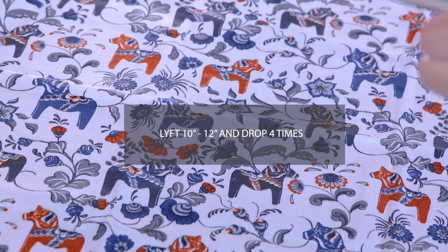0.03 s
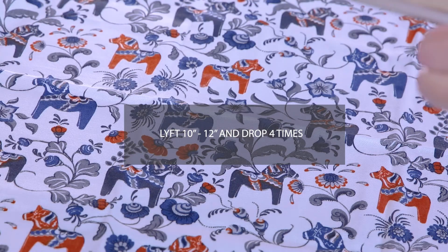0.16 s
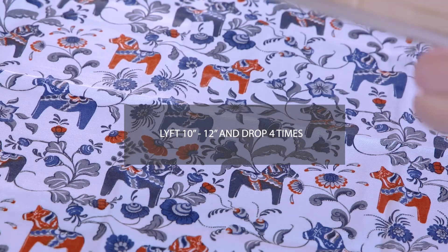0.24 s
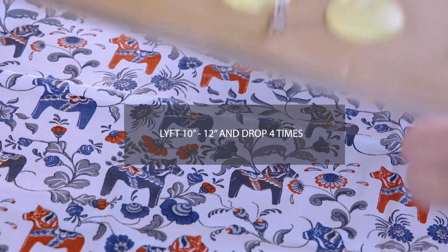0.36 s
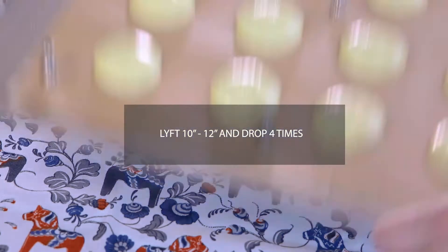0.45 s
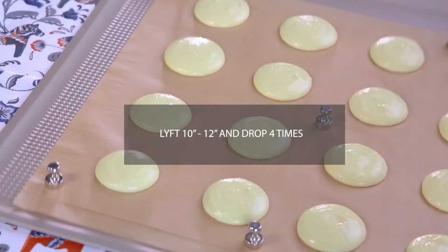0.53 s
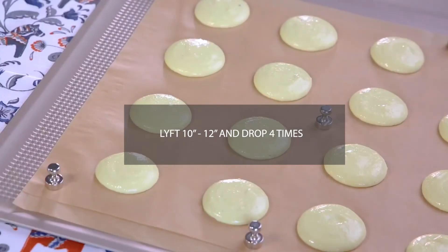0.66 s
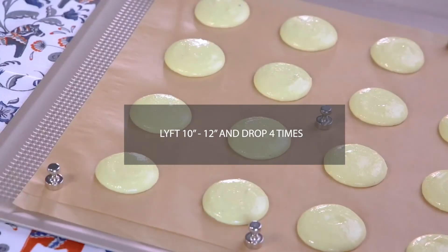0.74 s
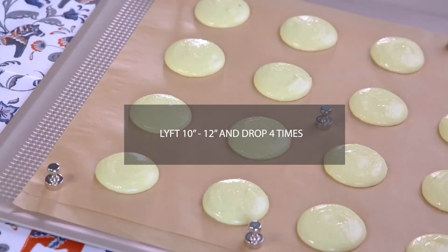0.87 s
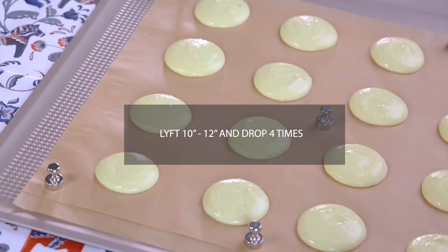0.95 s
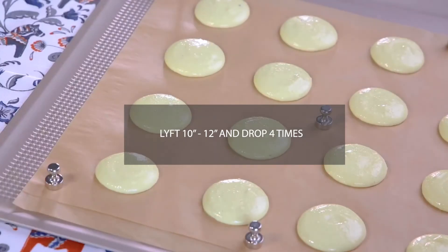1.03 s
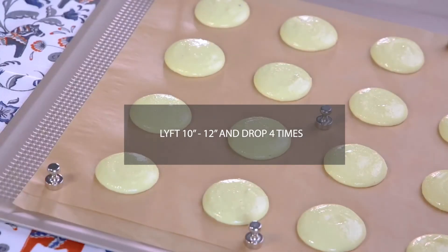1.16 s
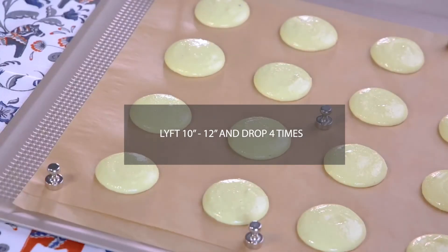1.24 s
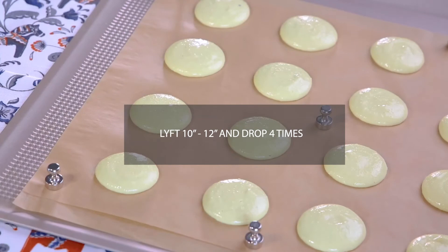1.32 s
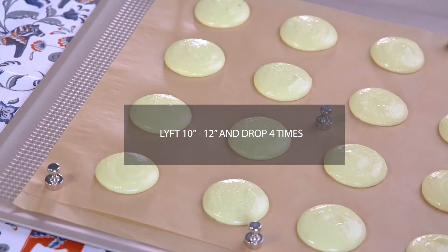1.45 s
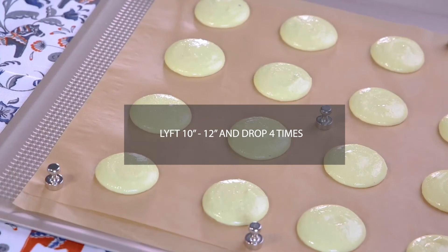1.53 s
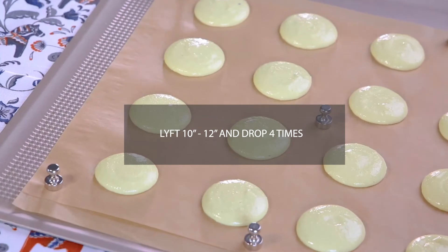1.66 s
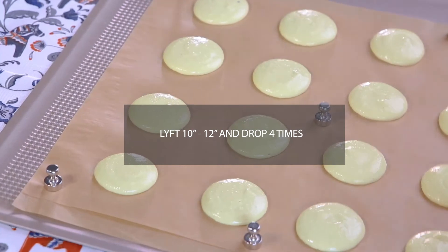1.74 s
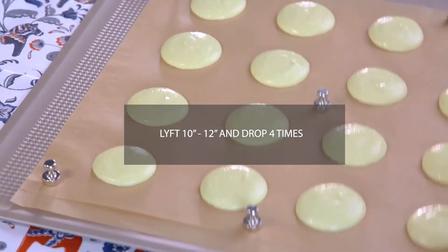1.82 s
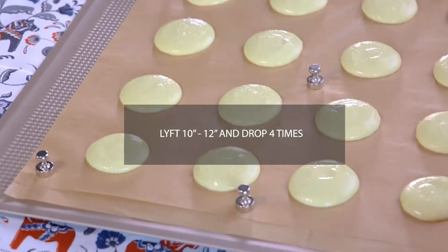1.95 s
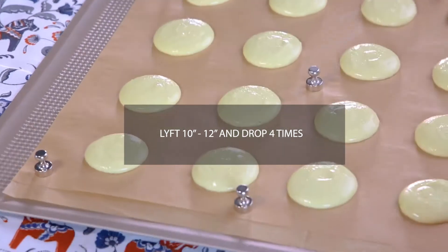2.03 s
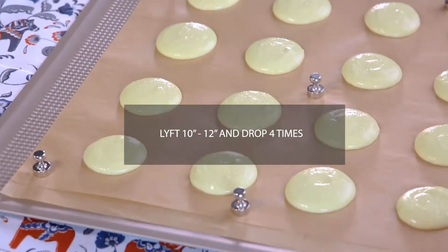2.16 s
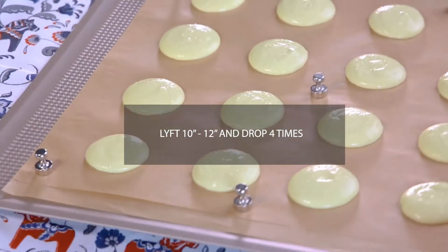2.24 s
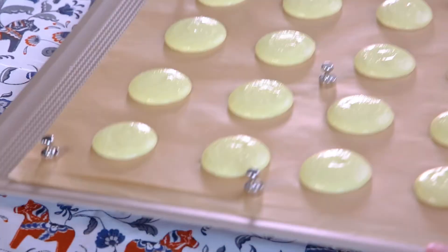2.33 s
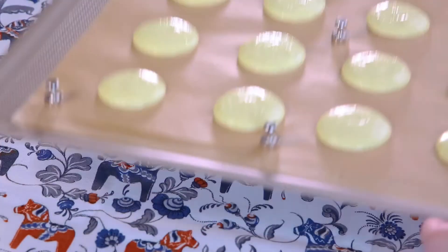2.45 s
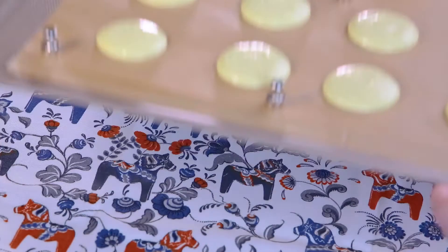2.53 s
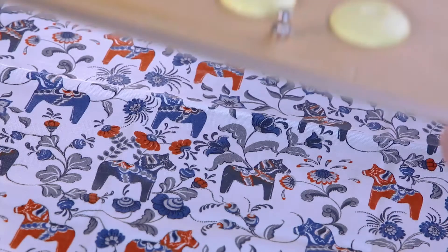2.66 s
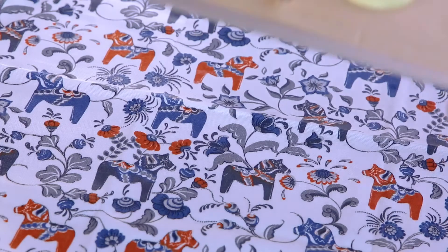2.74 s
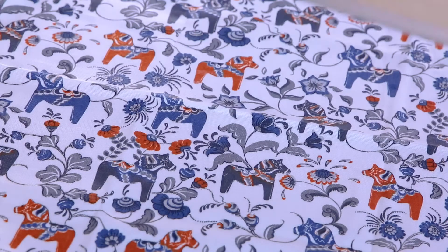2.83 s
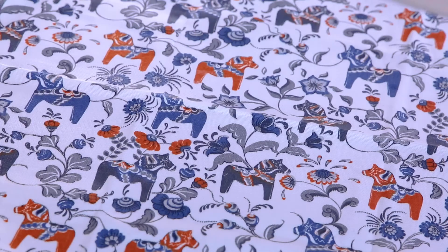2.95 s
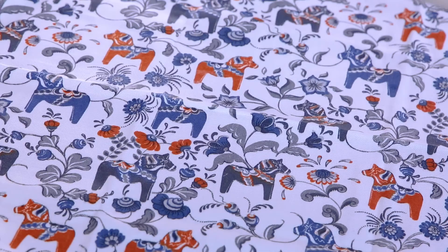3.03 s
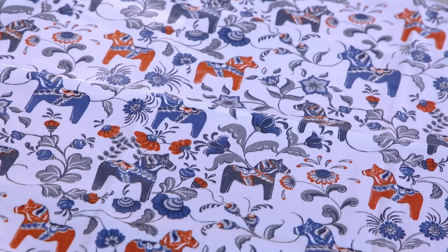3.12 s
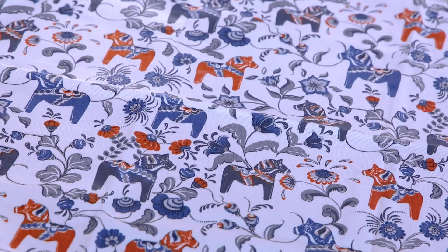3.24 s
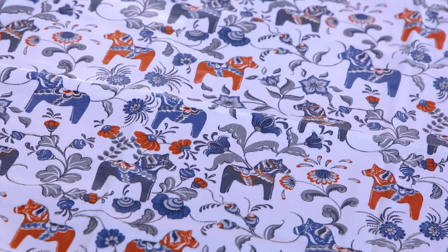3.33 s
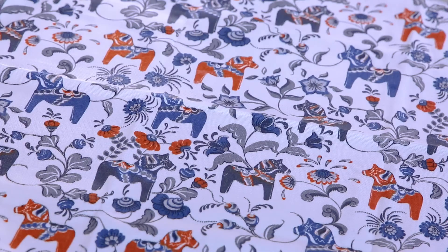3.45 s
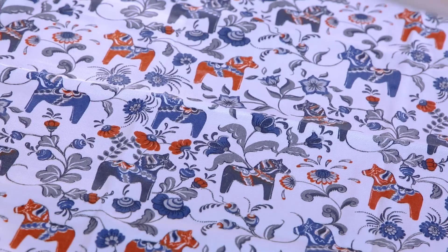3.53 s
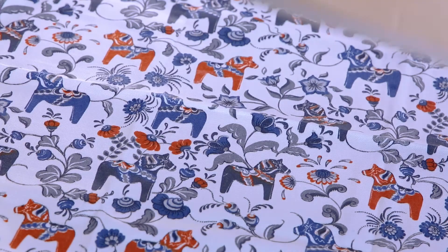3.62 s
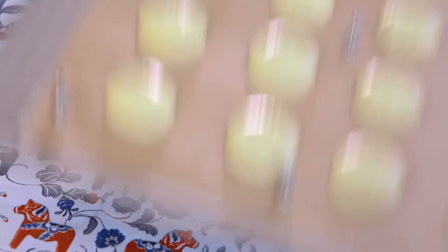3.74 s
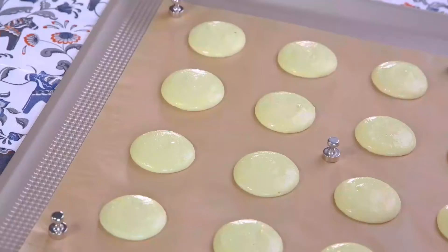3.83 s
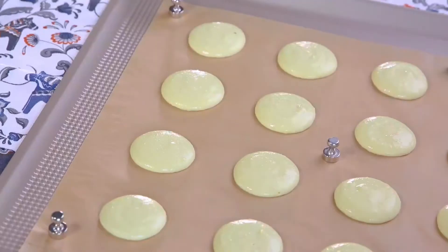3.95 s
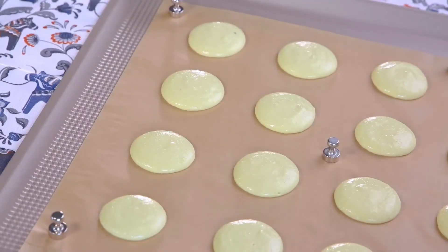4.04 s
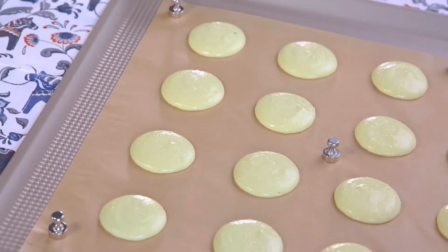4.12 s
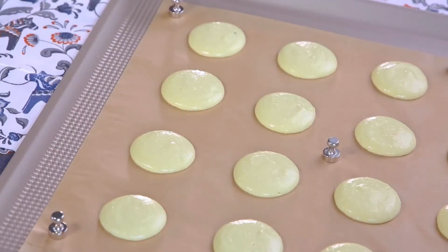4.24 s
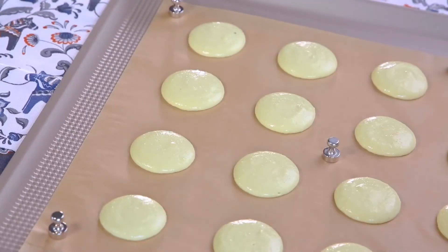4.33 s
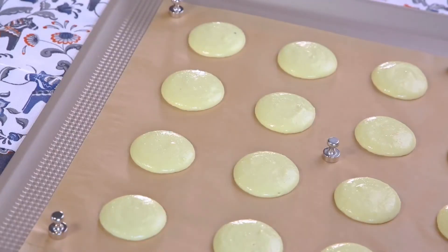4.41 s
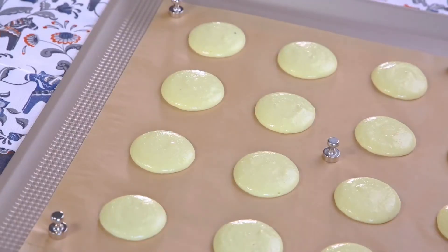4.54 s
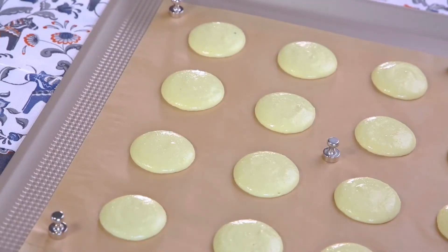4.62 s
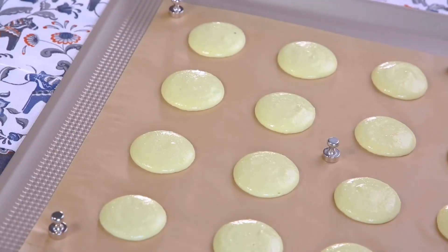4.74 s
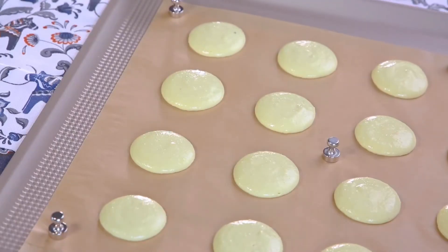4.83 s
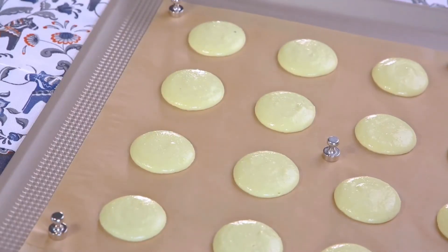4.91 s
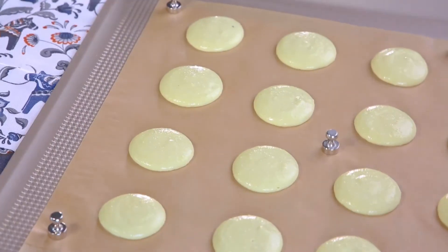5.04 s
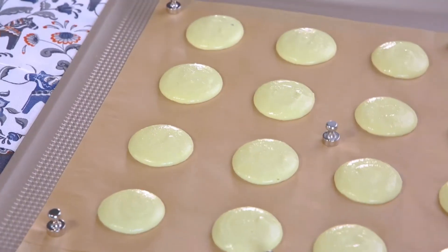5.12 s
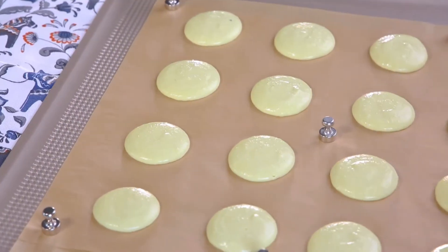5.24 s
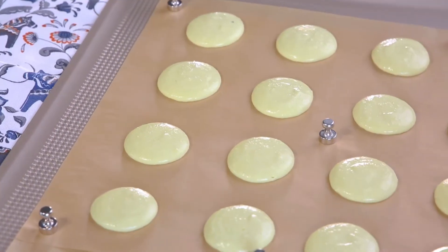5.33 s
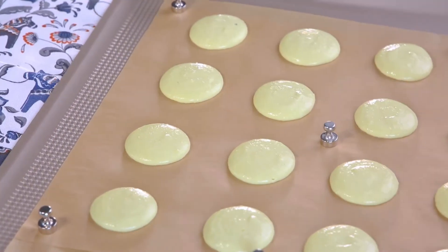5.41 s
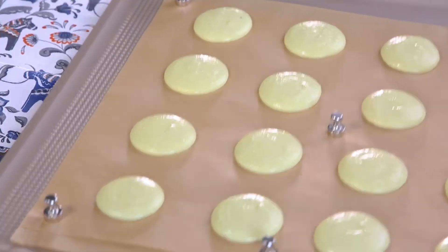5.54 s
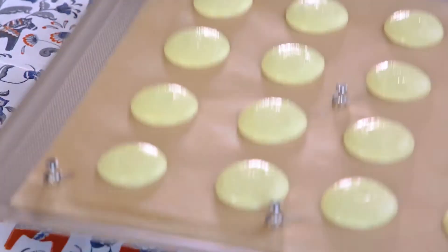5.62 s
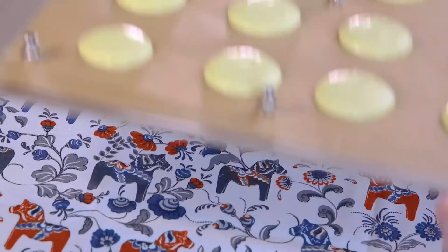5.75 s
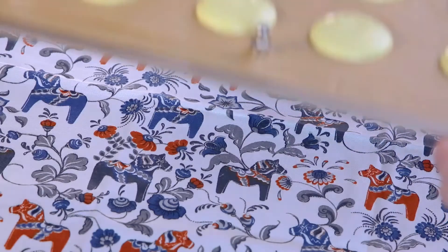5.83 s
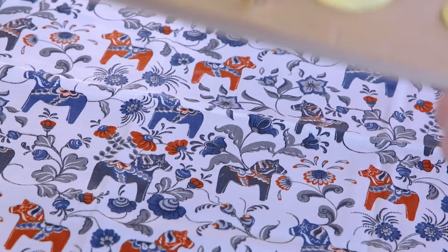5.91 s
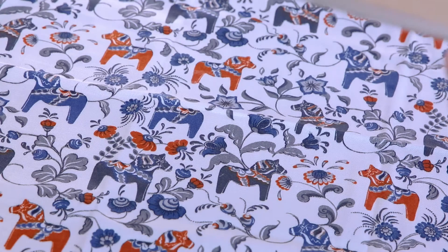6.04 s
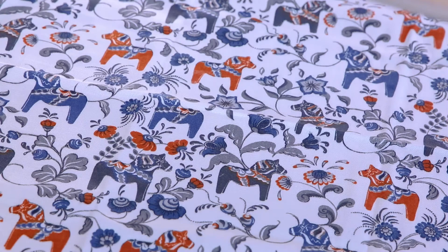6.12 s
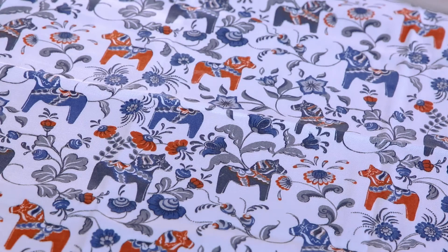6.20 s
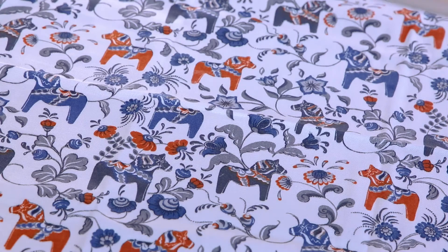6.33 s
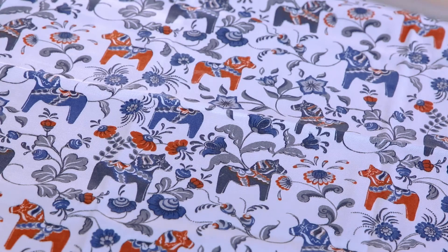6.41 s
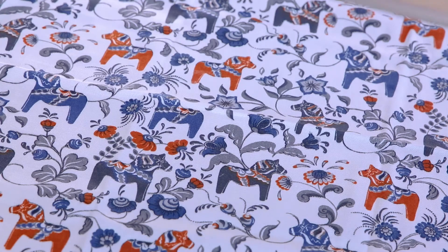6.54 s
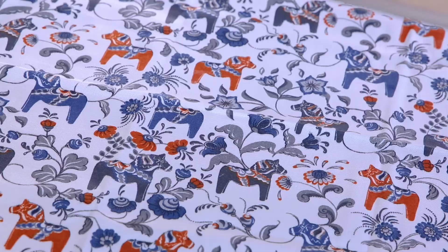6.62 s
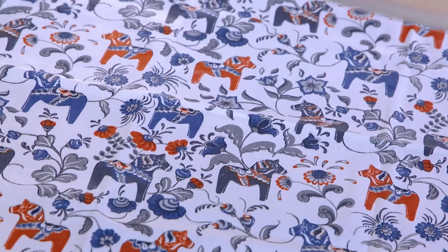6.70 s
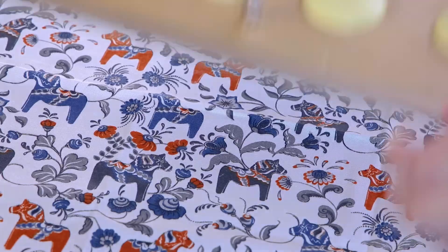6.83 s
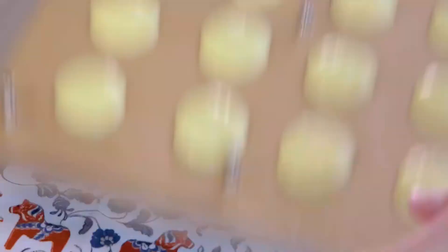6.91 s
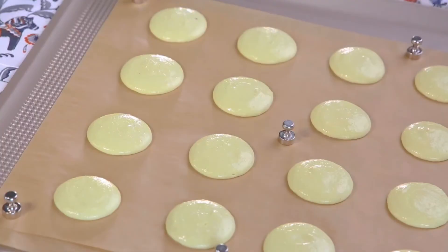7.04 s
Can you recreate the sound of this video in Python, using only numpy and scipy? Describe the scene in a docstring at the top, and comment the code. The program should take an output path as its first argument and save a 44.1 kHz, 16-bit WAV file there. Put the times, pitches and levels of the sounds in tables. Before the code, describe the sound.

Three times, a steel baking tray crashes flat onto a cloth-covered kitchen table with a hard double slap and ringing room echo, faint hum and cricket between.

```python
"""A flat crash, slap and fading echo, three times: a steel baking tray lands on a cloth-covered table in
a hard-walled kitchen. Around the drops: rim slides, tray ticks, paper rasps, hum, whines, a cricket.
Tray blows are decaying modes plus a noise crack; echo, slides, rasps, air and rumble are shaped noise;
the cricket is a modulated tone with a noise blur. The recorder's gain falls at loud sounds and climbs
back steadily, which holds the echo up; what it misses clips."""
import sys
import numpy as np
from scipy import signal
from scipy.fft import rfft, irfft
from scipy.io import wavfile
from scipy.ndimage import uniform_filter1d

SR = 44100
rng = np.random.default_rng(int(sys.argv[2]) if len(sys.argv) > 2 else 0)


def waveform_to_disk(signal):
    """Save audio, clipped to [-1, 1], as 16-bit WAV at the path in sys.argv[1]."""
    frames = np.transpose(np.atleast_2d(signal))
    scaled = np.clip(frames, -1, 1) * 32767
    samples = np.round(scaled).astype(np.int16)
    wavfile.write(sys.argv[1], SR, samples)


N = 311787

# ticks of the flexing tray, each with a paper rasp: t/s, blow level/dB, region f/Hz, rasp level/dB
TRAY_TICKS = [(0.1163, -50, 3371, -70.5), (1.7348, -46.5, 1597, -56.5), (1.9688, -44, 2606, -56),
              (2.7090, -54, 4230, -54.5), (2.7140, -33, 2650, -50.5), (2.7290, -49.5, 6263, -63.5),
              (3.1400, -54.5, 2700, -71), (3.2736, -39.5, 2661, -57), (3.6420, -53, 4300, -57)]
# drops: corner touches, rim rolls down in four blows, table thuds, middle slaps and rebounds:
# first rim blow t/s, rim blow level/dB, first rim region f/Hz, last rim region f/Hz,
# crack re blow/dB, corner lead/s, rim blow gap/s, slap delay/s, slap level/dB, thud level/dB,
# thud region f/Hz, rumble level/dB, rumble f/Hz, air cushion level/dB, cushion rise time/s
DROPS = [(.5652, 15.274, 1455, 1047, -6.5, .0011, .0019, .0117, 17.13, -5, 230.2, -22, 80.34, -45, .015),
         (3.8308, 15, 2200, 1250, -7.5, .002, .0018, .008, 17.41, 1.5, 160.3, -24, 48.09, -36.5, .008),
         (7.0374, 9.868, 2640, 1304, -9.5, 0.0012573, .0025, .0122, 15.944, -1.5, 144.2, -27.5, 69.7, -44, 0.01041)]


def amp(db):
    """Decibels to gain."""
    return 10 ** (np.asarray(db) / 20)


def evened(x):
    """Scales to an rms of one."""
    return x / np.sqrt(np.mean(x ** 2) + 1e-20)


def read(points, hz):
    """Value of a spectrum table, interpolated over log frequency."""
    f, value = np.transpose(points)
    return np.interp(np.log(hz + 1), np.log(f + 1), value)


def add(mix, start_s, sound):
    """Mixes a sound in from start_s."""
    part = mix[round(start_s * SR):][:len(sound)]
    part += sound[:len(part)]


def noise(count, gain_db):
    """Noise of rms one; gain_db gives its colour as a function of Hz."""
    hz = np.fft.rfftfreq(count, 1 / SR)
    spectrum = rfft(rng.standard_normal(count)) * amp(gain_db(hz))
    return evened(irfft(spectrum, count))


def wander(count, smooth_samples):
    """Slow random drift of rms one: smoothed noise."""
    return evened(uniform_filter1d(rng.standard_normal(count), smooth_samples))


def hill_db(hz, centre_hz, octaves):
    """Bell-shaped weighting over pitch, floored at -60 dB."""
    return np.maximum(-6 * (np.log2((hz + 1) / centre_hz) / octaves) ** 2, -60)


def peak_db(hz, centre_hz, width_hz):
    """Colour of a steep narrow resonance."""
    return -20 * np.log10(1 + (2 * (hz - centre_hz) / width_hz) ** 2)


def room_tone():
    """Fridge fan and room air as noise with faint drifting patches, over a wavering hum."""
    # air spectrum: f/Hz, relative level per Hz/dB
    air_spectrum = [(12, -55.5), (20, -27), (49, -13), (85, -17), (123, -7), (208, -4), (455, -6.5),
                    (672, -9.5), (794, -8.5), (1240, -15.5), (2290, -20), (3890, -25.5), (4870, -25),
                    (5750, -28), (15700, -35)]
    air_db, hum_hz, hum_db = -57, 121.64, -69.5
    frames, hz = N // 256 + 5, np.fft.rfftfreq(2048, 1 / SR)
    real, imag, patches = rng.standard_normal((frames, 1025, 3)).T
    # smooth over frequency, then time
    patches = evened(uniform_filter1d(uniform_filter1d(patches, 20, 0), 12, 1))
    frames_z = (real + 1j * imag) * amp(read(air_spectrum, hz)[:, None] + .9 * patches)
    air = evened(signal.istft(frames_z, nperseg=2048, noverlap=1792)[1][:N])
    waver = amp(1.5 * wander(N, 6000))
    hum = np.sqrt(2) * np.sin(2 * np.pi * hum_hz * np.arange(N) / SR) * waver
    return amp(air_db) * air + amp(hum_db) * hum


def whines():
    """Faint whines of the fridge motor: noise in narrow resonances."""
    # f/Hz, width/Hz, level/dB
    resonances = [(353.75, 37, -70), (574, 29, -70), (1406.9, 20, -77), (2283.5, 450, -73)]
    return sum(amp(db) * noise(N, lambda f: peak_db(f, hz, width_hz)) for hz, width_hz, db in resonances)


def chirps():
    """Cricket envelope: soft-edged chirps, each slightly early or late, louder or softer."""
    # evenly spaced chirps: middle of first chirp t/s, end t/s, period/s, level/dB
    bouts = [(0.122, .5, 0.3428, -69.5), (1.322, 2.8, 0.26863, -70.5), (3.069, 7, .269, -70.5)]
    chirp_s, jitter_s, spread_db = .18, .012, 1.3205
    t, envelope = np.arange(N) / SR, np.zeros(N)
    for first_s, end_s, period_s, db in bouts:
        for middle_s in np.arange(first_s, end_s, period_s):
            late, loud = rng.standard_normal(2)
            offset_s = t - middle_s - jitter_s * late
            envelope += amp(db + spread_db * loud) * np.exp(-np.abs(1.9 * offset_s / chirp_s) ** 3)
    return envelope


def cricket():
    """Wing strokes modulate a drifting pure tone; scattering on the way adds a blur around it."""
    wing_hz, blur_width_hz, strokes_per_s = 4937.7, 170, 64
    envelope = chirps()
    turns = np.cumsum(strokes_per_s * (1 + .1 * wander(N, 4000))) / SR
    strokes = 1 + .65 * np.cos(2 * np.pi * turns)
    drift = 1 + .005 * wander(N, 1500)
    tone = np.sqrt(2) * np.sin(2 * np.pi * np.cumsum(wing_hz * drift) / SR)
    blur = noise(N, lambda f: peak_db(f, wing_hz, blur_width_hz))
    return envelope * (.45 * strokes * tone + .9 * blur)


def blow(db, region_hz, crack_db, octaves, far_db):
    """One contact rings the modes near its region and cracks; returns near sound and wall feed."""
    # tray modes, damped by cloth and paper: f/Hz, relative level/dB, t60/s
    modes = [(131.8, -17.5, 0.038), (235.58, -10, 0.03), (431.25, -12, 0.065), (528.36, -6, .03),
             (643.61, -1.5, 0.032), (764.23, -5, .02), (910, -0.5, 0.01), (1173.8, -5, 0.013),
             (1358.7, -0.5, 0.01), (1630.9, -4, 0.016), (1763.6, -3.5, 0.015), (2011.2, -2.5, 0.0095),
             (2181.6, -1.5, 0.011), (2570.5, 0, 0.014), (2958.9, -7.5, 0.02), (3350, -7, .015),
             (3730, -5.5, 0.012), (4707, -9.5, 0.033), (5312.5, -9, 0.0064), (6257, -8.5, 0.022),
             (7860, -12, 0.0082)]
    # crack spectrum: f/Hz, relative level/dB
    crack_spectrum = [(150, -20), (600, -0.5), (1500, -1.5), (4000, -5), (8000, -12.5), (12000, -18),
                      (16000, -23)]
    # the walls receive more crack and less ring than the listener
    wall_crack_db, wall_ring_db = 1.5, -1.5
    crack_t60_s, rise_s = 0.02331, 0.00017
    t = np.arange(4096) / SR
    hz, mode_db, t60_s = np.transpose(modes)[:, :, None]
    detune, phase = rng.uniform(-1, 1, (2, len(modes), 1))
    tones = np.sin(2 * np.pi * hz * (1 + 0.0094 * detune) * t + 1.5 * phase)
    rings = amp(mode_db - 60 * t / t60_s) * tones
    crack = noise(4096, lambda f: read(crack_spectrum, f)) * amp(crack_db - 60 * t / crack_t60_s)
    near_db = np.maximum(hill_db(hz, region_hz, octaves), far_db)
    # summed over all directions, the modes radiate more evenly than towards one listener
    weights = amp([near_db, .3 * near_db])
    ring = (weights * rings).sum(1) / np.linalg.norm(weights * amp(mode_db), axis=1)
    both = amp([[0], [wall_ring_db]]) * ring + amp([[0], [wall_crack_db]]) * crack
    return amp(db) * both * (1 - np.exp(-t / rise_s))


def contacts(s, db, rim_hz, end_hz, crack_db, lead_s, gap_s, slap_s, slap_db, thud_db, thud_hz, *_):
    """Blows of one landing as rows: t/s, level/dB, region f/Hz, crack re blow/dB."""
    roll_loss_db = 1  # per rim blow
    rebound_gap_s, rebound_loss_db, rebound_hz, rebound_octaves = .0045, 2.5, 1492.3, 0.66
    corner = (s - lead_s, -16.5, 850, -9)
    thud = (s + 0.0037, thud_db, thud_hz, -19)
    slap = (s + slap_s, slap_db, 1118.1, -4.5)
    rows = [corner, thud, slap]
    for k, hz in enumerate(np.geomspace(rim_hz, end_hz, num=4)):
        rows.append((s + k * gap_s, db - k * roll_loss_db, hz, crack_db))
    for k, spot in enumerate(rng.uniform(-0.66, 1, size=3), 1):
        hz = rebound_hz * 2 ** (rebound_octaves * spot)
        rows.append((s + slap_s + k * rebound_gap_s, slap_db - k * rebound_loss_db, hz, -5.5))
    return rows


def kitchen(x):
    """Dense reflections that set in after 4 ms, each band dying at its own speed."""
    # reverberation time: f/Hz, t60/s
    band_t60 = [(60, 0.31), (130, 0.15), (205, 0.63), (320, 0.71), (600, 0.65), (1000, 0.68787),
                (1750, 0.79026), (2800, 0.6498), (4500, 0.7429), (8000, 0.53), (12000, 0.36), (16000, 0.42)]
    # echo colour: f/Hz, relative level/dB
    band_colour = [(60, -7), (130, -4.5), (205, 0.5), (320, -11), (460, -2.5), (700, -0.5), (1100, -0.5),
                   (1700, -2), (2800, -1), (4500, -1.5), (8000, 2), (12000, 1.5), (16000, -1.5)]
    hz, t = np.fft.rfftfreq(512, 1 / SR), np.arange(170) * 256 / SR
    real, imag = rng.standard_normal((2, len(hz), len(t)))
    decay_db = read(band_colour, hz)[:, None] - 60 * t / read(band_t60, hz)[:, None]
    tail = signal.istft((real + 1j * imag) * amp(decay_db), nperseg=512)[1]
    tail = tail * np.clip((np.arange(len(tail)) / SR - .004) / 0.0011, 0, 1)
    return signal.fftconvolve(x, tail / np.linalg.norm(tail))


def tray():
    """Landings and ticks; each blow sends its own pattern of reflections round the room."""
    landing_echo_db, tick_echo_db = -5.5, -13
    out = np.zeros(N)
    blows = [row for drop in DROPS for row in contacts(*drop)]
    # tick crack: -54 dB for a -52 dB blow, growing 0.481 dB per dB; expressed re blow
    ticks = [(s, db, hz, -54 + 0.481 * (db + 52) - db) for s, db, hz, _ in TRAY_TICKS]
    groups = (blows, .5, -16, landing_echo_db), (ticks, .13, -45, tick_echo_db)
    for rows, octaves, far_db, echo_db in groups:
        for s, *how in rows:
            near, radiated = blow(*how, octaves, far_db)
            add(out, s, near)
            add(out, s, amp(echo_db) * kitchen(radiated))
    # a flat plate radiates little deep bass
    return signal.lfilter(*signal.butter(3, 115., "high", fs=SR), out)


def paper():
    """Baking paper: grainy rasps in the pitch region of their tick, quick to set in, then dying away."""
    octaves, t60_s, rise_s = .68, .33, 0.004265
    out, t = np.zeros(N), np.arange(12000) / SR
    for s, _, hz, db in TRAY_TICKS:
        grain = amp(2.8 * wander(len(t), 60))
        rasp = noise(len(t), lambda f: hill_db(f, hz, octaves)) * grain
        add(out, s, amp(db - 60 * t / t60_s) * (1 - np.exp(-t / rise_s)) * rasp)
    return out


def fingers():
    """Skin sliding on the rim: fine, uneven hiss that swells faster than it fades."""
    # start t/s, length/s, level/dB, centre f/Hz, spread/octaves
    slides = [(0.426, 0.12836, -52.5, 10900, 1.575), (1.657, 0.07766, -72.5, 12000, .7),
              (2.022, 0.076, -67.5, 12500, 0.6742), (2.106, 0.12985, -53.5, 10860, 0.9655),
              (3.656, 0.08165, -58.5, 11200, .6), (4.911, 0.15, -71, 12000, .9),
              (5.11, .05, -65.5, 9980, 0.88), (5.24, .06, -70, 11020, 0.709),
              (5.481, 0.2781, -69, 7500, .8), (6.831, 0.1176, -59.5, 11540, .6),
              (6.86, 0.11567, -57, 3700, 1.047)]
    # a narrow peak grows as the slide gets louder
    squeak_hz, squeak_width_hz, squeak_from_db, squeak_db_per_db = 11066, 1200, -70.5, .4
    out = np.zeros(N)
    for s, length_s, db, hz, octaves in slides:
        count = round(length_s * SR)
        squeak_db = max(squeak_db_per_db * (db - squeak_from_db), 0)

        def colour_db(f):
            squeak = np.exp(-((f - squeak_hz) / squeak_width_hz) ** 2)
            return hill_db(f, hz, octaves) + squeak_db * squeak

        grip = amp(1.5 * wander(count, 150))
        swell = np.sin(np.pi * np.linspace(0, 1, count) ** 0.5) ** 2
        add(out, s, amp(db) * swell * grip * noise(count, colour_db))
    return out


def cushion():
    """Air squeezed out under the falling tray: a low rush that swells until the corner touches."""
    # f/Hz, relative level/dB
    rush_spectrum = [(30, -12), (200, -4), (800, -8.5), (2500, -16.5), (8000, -27.5), (16000, -36.5)]
    out, before_s = np.zeros(N), np.arange(-4096, 0) / SR
    for s, _, _, _, _, lead_s, *_, db, rise_s in DROPS:
        rush = noise(4096, lambda f: read(rush_spectrum, f))
        add(out, s - lead_s + before_s[0], amp(db) * np.exp(before_s / rise_s) * rush)
    return out


def shudder():
    """The table's legs and the floor rumble on from the first rim blow: low noise, decaying."""
    octaves, t60_s, rise_s = .55, .45, .004
    out, t = np.zeros(N), np.arange(SR // 2) / SR
    for s, *_, db, hz, _, _ in DROPS:
        rumble = noise(len(t), lambda f: hill_db(f, hz, octaves))
        add(out, s, amp(db - 60 * t / t60_s) * np.minimum(t / rise_s, 1) * rumble)
    return out


def scene():
    """The tray and hands in the kitchen, over its background sounds."""
    hands = fingers()
    hands = hands + amp(-10.5) * kitchen(hands)[:N]
    impacts = tray() + shudder() + paper() + cushion()
    background = cricket() + whines() + room_tone()
    return (impacts + hands + background)[None]


def record(dry):
    """Gain control falls within ms and climbs back steadily; what it misses clips; then a low-pass."""
    follow_s, attack_s, threshold_db, edge_hz = 0.011, 0.0041, -16, 15800
    climb_db_per_s = 66.117  # fall of the held level
    gain_db_per_db = 0.96966  # gain reduction per dB over threshold
    follow, attack = np.exp(-1 / (follow_s * SR)), np.exp(-1 / (attack_s * SR))
    power = signal.lfilter([1 - follow], [1, -follow], dry[0] ** 2)
    power_db = 10 * np.log10(power + 1e-12)
    climb_db = np.arange(N) * climb_db_per_s / SR
    held_db = np.maximum.accumulate(power_db + climb_db) - climb_db
    over_db = np.maximum(held_db - threshold_db, 0)
    ducked = dry / amp(gain_db_per_db * signal.lfilter([1 - attack], [1, -attack], over_db))
    clipped = np.clip(ducked, -1, 1)
    low_pass = signal.firwin(511, edge_hz, window=("kaiser", 9), fs=SR)
    return signal.oaconvolve(clipped, low_pass[None], "same")


dry = scene()
out = record(dry)
waveform_to_disk(out)
```